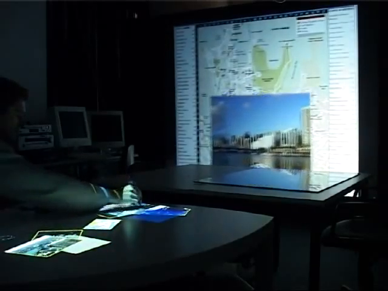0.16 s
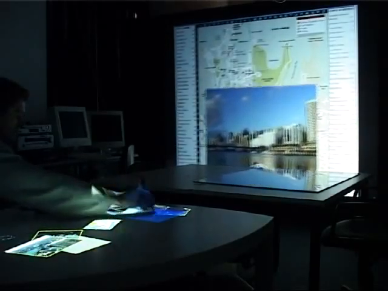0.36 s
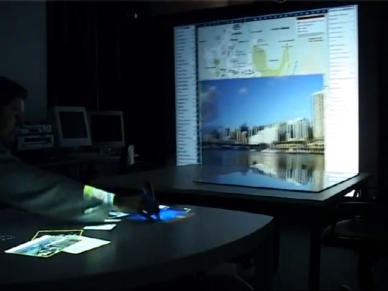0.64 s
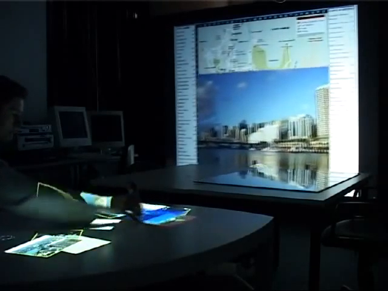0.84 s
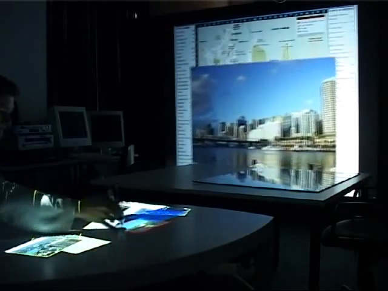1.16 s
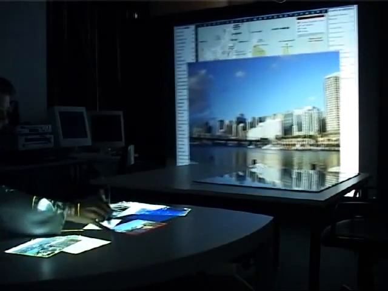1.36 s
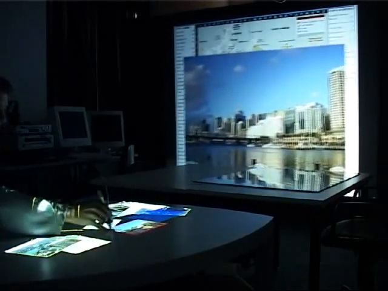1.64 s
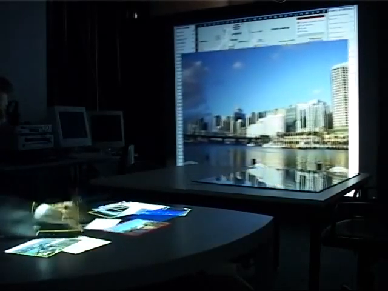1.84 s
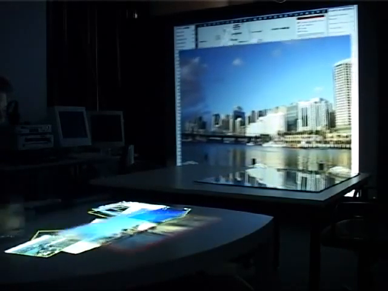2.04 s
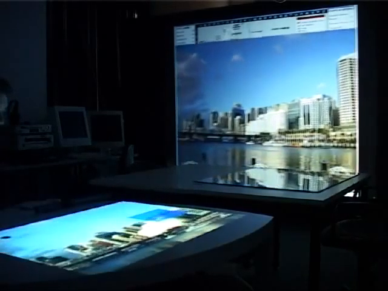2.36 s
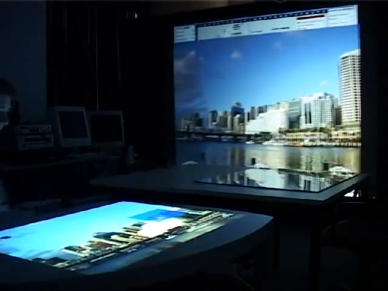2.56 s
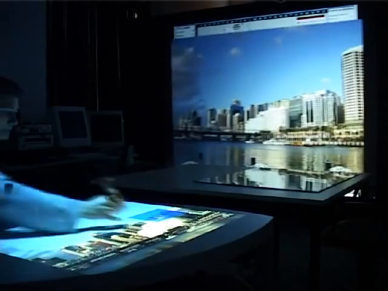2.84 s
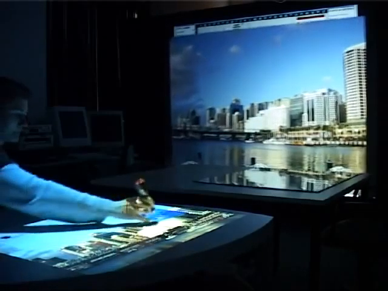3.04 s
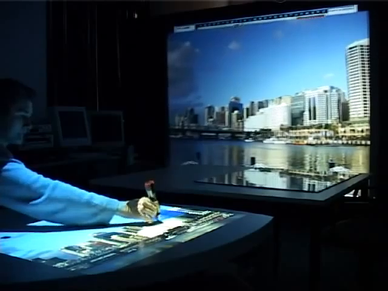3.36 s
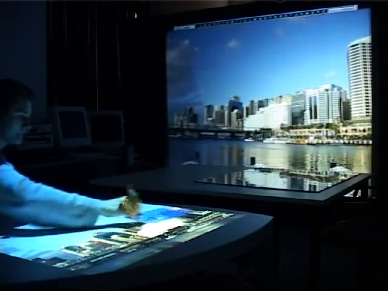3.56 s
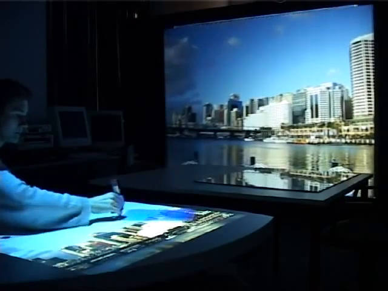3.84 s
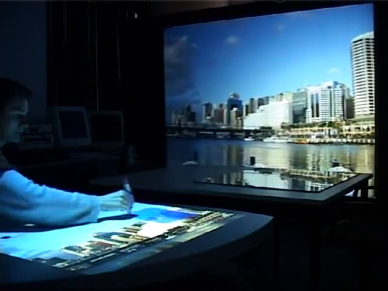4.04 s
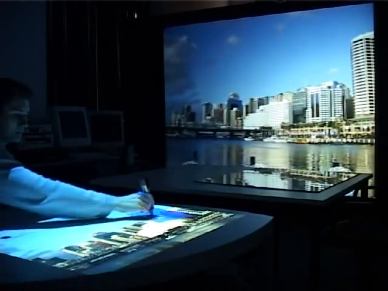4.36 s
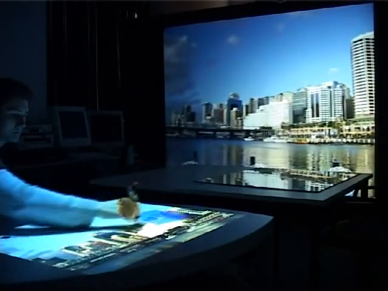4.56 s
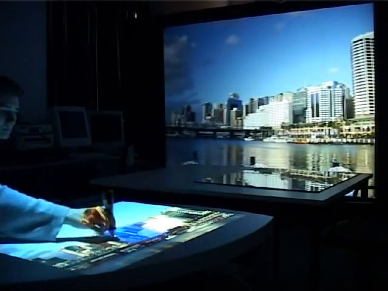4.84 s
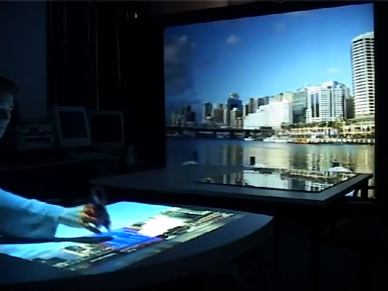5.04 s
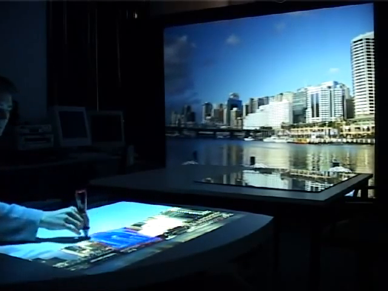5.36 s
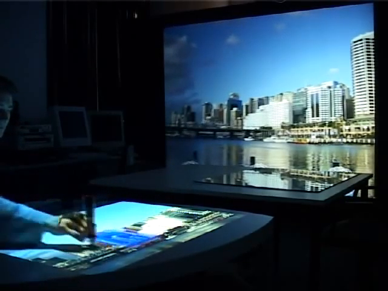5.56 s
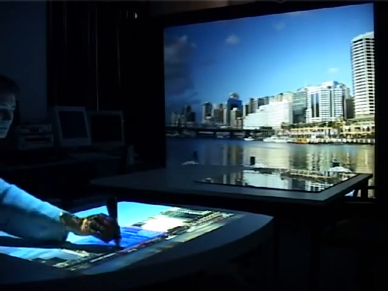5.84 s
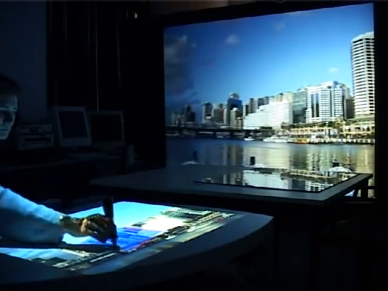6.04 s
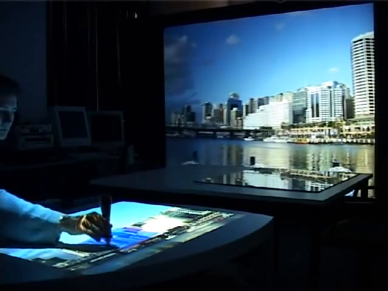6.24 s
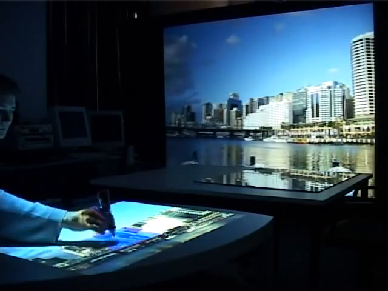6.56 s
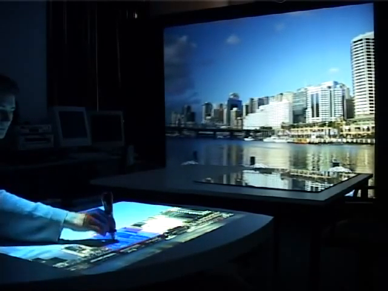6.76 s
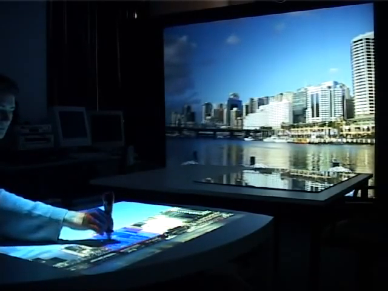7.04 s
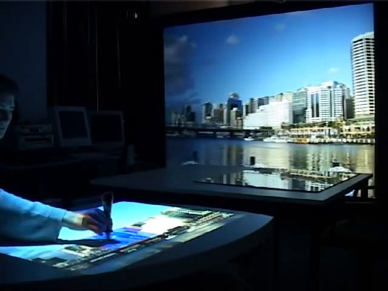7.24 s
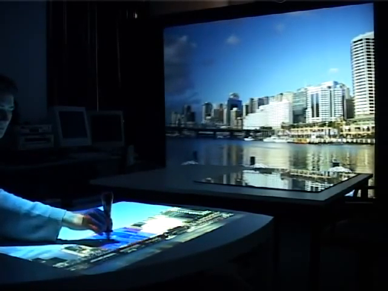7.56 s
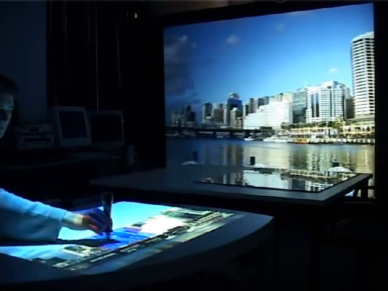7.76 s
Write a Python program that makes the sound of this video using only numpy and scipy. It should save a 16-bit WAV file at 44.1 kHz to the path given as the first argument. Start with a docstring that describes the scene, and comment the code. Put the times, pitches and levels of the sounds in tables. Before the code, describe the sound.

An indoor office with smooth, low-weighted fan noise, thin steady motor tones and a deep hum wavering in pitch and strength, throughout about eight seconds. A stylus works on a hard tabletop a few metres away. At 0.05 s it taps with a crisp click and short hollow knock; a barely audible touch comes at 0.46 s, amid very faint rubbing from 0.15 to 1.2 s. A second clear tap at 1.6 s leads into the most noticeable scrape, hissy with a woody tone, from 1.75 to 2.4 s. Stronger taps follow at 3.3, 4.3, 5.3 and 6.75 s, each a tight double contact with a low thump and brief room echo. Soft drags follow at 3.4-4.05, 4.4-4.9 and, fainter, 5.4-5.85 s. After the last tap, only fans and hum remain, the hum swelling slightly toward the end.

```python
"""In a dim office, a plastic stylus taps a hard round tabletop and drags across it between taps, a few metres away.
Each tap is a short click, damped tabletop modes and a low thump; the tip touches twice, and the walls answer.
Strokes are random slips of the tip, coloured into a hiss and a tabletop resonance.
Behind them are fans (shaped noise), a low wavering hum (a gliding tone) and thin, steady motor tones."""
import sys
import numpy as np
from scipy import signal
from scipy.fft import rfft, irfft
from scipy.io import wavfile
from scipy.ndimage import uniform_filter1d

SR = 44100
rng = np.random.default_rng(int(sys.argv[2]) if len(sys.argv) > 2 else 0)


def digitize_waveform(pressure):
    """Quantize a signal to 16-bit integers and store it at the path in sys.argv[1].

    Rows of a 2-D input are taken as channels; values are limited to [-1, 1].
    """
    field = np.atleast_2d(pressure).T
    bounded = np.clip(field, -1, 1)
    quanta = np.round(bounded * 32767).astype(np.int16)
    wavfile.write(sys.argv[1], SR, quanta)


N = 347949  # length in samples

# How a blow drives the tabletop's modes: (frequency [Hz], level [dB])
MODE_DRIVE = [(113, -22.5), (205, -23.5), (355, -23.5), (490, -24), (635, -21), (860, -14), (1100, -16.5),
              (1500, -17.5), (1800, -17.5), (2150, -14.5), (2850, -16), (3500, -19.5), (4300, -19),
              (7000, -14)]


def gain_of(db):
    """Amplitude factor of a level in dB."""
    return 10 ** (np.asarray(db) / 20)


def evened(x):
    """Scales a sound to an RMS of 1."""
    return x / np.sqrt(np.mean(x ** 2) + 1e-20)


def read(points, hz):
    """Reads a curve of (frequency, value) points along a logarithmic frequency axis."""
    f, value = np.transpose(points)
    return np.interp(np.log(hz + 1), np.log(f + 1), value)


def add(mix, s, sound):
    """Mixes a sound in at s seconds, cut off at the end of the mix."""
    part = mix[..., round(s * SR):][..., :sound.shape[-1]]
    part += sound[..., :part.shape[-1]]


def resonate(x, hz, width):
    """Shifts the frequency hz down to zero, smooths, and shifts back: a resonance of gain 1."""
    turn = np.exp(2j * np.pi * np.cumsum(hz * np.ones(len(x))) / SR)
    r = np.exp(-np.pi * width / SR)
    smoothed = signal.lfilter([1 - r], [1, -r], x / turn + 1e-18)
    return 2 * (turn * smoothed).real


def pair(a, b, same):
    """Two microphone spectra that share a part of their noise."""
    same = np.clip(same, -1, 1)[:, None]
    return np.array([a, same * a + np.sqrt(1 - same ** 2) * b])


def tip_click(t, spot_hz):
    """The tip clicks for a cycle or two, pitched a little above the main ring of the struck spot."""
    over_spot, decay_s = 1.244, 0.00041
    return -np.exp(-(t / decay_s) ** 2) * np.sin(2 * np.pi * over_spot * spot_hz * t)


def tabletop_ring(t, spot_hz, width_hz, spot_db, lower_db):
    """The tabletop's damped modes ring together, strongest around the pitch of the struck spot."""
    # Damped modes of the tabletop: (frequency [Hz], time to fall 60 dB [s])
    table_modes = [(285, 0.027), (420, 0.032), (490, 0.076), (560, 0.063), (635, 0.065), (720, 0.027),
                   (800, 0.041), (900, 0.042), (1010, 0.042), (1180, 0.042), (1290, 0.035), (1410, 0.027),
                   (1500, 0.033), (1640, 0.019), (1800, 0.036), (2020, 0.0061), (2280, 0.013),
                   (2750, 0.0068), (3000, 0.005), (3500, 0.0047), (4300, 0.0035), (5200, 0.004),
                   (7000, 0.00063)]
    lower_hz = 1050  # modes under this are the lower ones
    load = 1 + .012 * rng.standard_normal(len(table_modes))  # the resting hand detunes the modes slightly
    ring = np.zeros(len(t))
    for k, (hz, t60) in enumerate(table_modes):
        spot_boost_db = spot_db * np.exp(-(2 * (hz - spot_hz) / width_hz) ** 2)
        drive_db = read(MODE_DRIVE, hz) + spot_boost_db + lower_db * (hz < lower_hz)
        # neighbouring modes start in opposite directions
        ring += (-1) ** k * gain_of(drive_db - 60 * t / t60) * np.sin(2 * np.pi * hz * load[k] * t)
    return ring


def low_thump(t):
    """Slow low modes swell within milliseconds and ring on, slightly out of step between the microphones."""
    # Slow low modes: (frequency [Hz], time to fall 60 dB [s])
    slow_modes = [(113, 0.77), (136, 0.21), (197, 0.48), (213, 0.68), (345, 0.51), (363, 0.36)]
    start = rng.random((len(slow_modes), 1, 1))  # phases in cycles
    start = start + 0.043 * rng.standard_normal((len(slow_modes), 2, 1))
    thump = np.zeros((2, len(t)))
    for (hz, t60), cycles in zip(slow_modes, start):
        thump += gain_of(read(MODE_DRIVE, hz) - 60 * t / t60) * np.sin(2 * np.pi * (hz * t + cycles))
    return thump * (1 - np.exp(-t / 0.0013))


def tap(blow_db, click_db, spot_hz, width_hz, spot_db, lower_db, thump_db):
    """One contact: the tip clicks, the tabletop's modes take over, and the low modes swell and ring on."""
    t = np.arange(SR // 2) / SR
    onset = 1 - np.exp(-(t / 0.0001) ** 2)
    click = onset * tip_click(t, spot_hz)
    ring = onset * tabletop_ring(t, spot_hz, width_hz, spot_db, lower_db)
    thump = low_thump(t)
    return gain_of(blow_db + click_db) * click, gain_of(blow_db) * ring, gain_of(blow_db + thump_db) * thump


def stroke(start, fast_s, firm_s, end, hiss_db, body_db):
    """The tip catches on the grain thousands of times a second: speed makes a hiss, pressure hums the main modes."""
    # Colour of the rubbing hiss: (frequency [Hz], level [dB per Hz])
    rub_colour = [(1060, -36), (1800, -2.5), (2770, 0.5), (3480, -7.5), (4050, -0.5), (7250, -10.5),
                  (9240, -16.5), (10400, -145), (11000, -37), (14300, -88.5), (22000, -120)]
    start_db, end_db, roundness = -8, -22, 1.88  # levels below the top at both ends; shape of the swell
    slips_per_s, body_hz, body_width_hz = 6000, 1440, 740
    t = np.arange(start, end, 1 / SR)

    def swell(top_s):
        away = np.interp(t, [start, top_s, end], [-1, 0, 1])
        return gain_of(np.where(away < 0, start_db, end_db) * abs(away) ** roundness)

    speed, pressure = swell(fast_s), swell(firm_s)
    size, chance, sign = rng.exponential(1, len(t)), rng.random(len(t)), rng.standard_normal(len(t))
    slips = gain_of(4.2 * np.minimum(size, 3.5)) * sign * (chance < slips_per_s / SR)
    hz = np.fft.rfftfreq(len(t), 1 / SR)
    hiss = evened(irfft(rfft(slips) * gain_of(read(rub_colour, hz)), len(t)))
    body = resonate(slips, body_hz, body_width_hz)
    body = evened(resonate(body, body_hz, body_width_hz))
    rub = gain_of(hiss_db) * speed * hiss + gain_of(body_db) * pressure * body
    return start, rub * signal.windows.tukey(len(t), .15)


def early_echoes():
    """Direct sound, then single echoes from table, floor and walls."""
    # Single echoes: (delay [s], left level [dB], right level [dB])
    echo_list = [(.0034, -9, -10), (.0062, -9, -8), (.0102, -7, -8), (.019, -6, -7)]
    right_lag = 1  # samples by which the tabletop reaches the right microphone later
    early = np.zeros((2, 2048))
    for k, (s, left_db, right_db) in enumerate(echo_list):
        width = int(1 + s * 600)  # samples; later echoes have lost more treble
        early[:, round(s * SR):][:, :width] = -(-1) ** k * gain_of([[left_db], [right_db]]) / width
    early[0, 0] = early[1, right_lag] = 1
    return early


def room_tail():
    """A dense scatter of reflections that dies away band by band."""
    # Reverberation by band: (frequency [Hz], time to fall 60 dB [s], relative tail level [dB])
    tail_bands = np.array([(100, 0.86, 7.5), (300, 0.46, 7.5), (810, 0.49, -2.5), (1490, 0.51, -1),
                           (3170, 0.71, -1), (5730, 0.51, -7), (9900, 0.11, -5)])
    # Left-right likeness of the tail: (frequency [Hz], likeness [-1 to 1])
    tail_likeness = [(100, 0.44), (600, 0.89), (1500, 0.5), (3000, 0.089), (8000, 0.82)]
    reflections = np.zeros((2, SR))
    at = np.arange(300, SR - 20, 20) + rng.integers(0, 20, (2, (SR - 301) // 20))
    np.put_along_axis(reflections, at, rng.choice([-1., 1.], at.shape), 1)
    hz, t, z = signal.stft(reflections, SR, nperseg=256)
    t60 = read(tail_bands[:, [0, 1]], hz)[:, None]
    level_db = read(tail_bands[:, [0, 2]], hz)[:, None]
    fading = pair(z[0], z[1], read(tail_likeness, hz)) * gain_of(level_db - 60 * t / t60)
    tail = signal.istft(fading, SR, nperseg=256)[1]
    return tail / np.linalg.norm(tail[0])


def hum():
    """A low tone that wavers in pitch and strength, louder and earlier on the right, with weak overtones."""
    # Path of the hum: (time [s], pitch [Hz], level before flutter and left-right tilt [dB])
    hum_path = [(0.0, 71.8, -52), (0.24, 73.8, -35), (0.36, 73.92, -43.5), (1.27, 77, -48),
                (2.28, 76.7, -44.5), (2.4, 70.35, -44), (3.07, 72.8, -43.5), (3.25, 66, -41),
                (4.22, 66.65, -39.5), (4.35, 63, -43), (4.55, 62, -43.5), (4.78, 66.8, -51.5),
                (4.9, 69.8, -36), (5.36, 70.3, -55), (5.47, 72.1, -42.5), (5.78, 75, -54),
                (5.91, 74.8, -38.5), (6.57, 74.8, -54.5), (6.68, 74.3, -37.5), (7.03, 77.5, -48),
                (7.27, 74.2, -35), (7.36, 75.2, -44), (7.49, 70.3, -30.5), (7.72, 72.3, -30.5),
                (7.79, 72.9, -41), (7.89, 73.3, -28)]
    flutter_db, flutter_hz = 1.5, 7.5  # RMS depth; fastest rate
    s, hz, db = np.transpose(hum_path)
    t = np.arange(N) / SR
    rates = flutter_hz * np.geomspace(.3, 1, 12)
    flutter = evened(sum(np.sin(2 * np.pi * (f * t + rng.random())) for f in rates))
    phase = 2 * np.pi * np.cumsum(np.interp(t, s, hz)) / SR + np.array([[0], [.3]])  # right leads
    tone = np.sin(phase) + gain_of(-20.0) * np.sin(2 * phase) + gain_of(-23) * np.sin(3 * phase)
    level = gain_of(np.interp(t, s, db) + flutter_db * flutter)
    return np.sqrt(2) * level * tone * gain_of([[-1.3], [1.2]])


def fans():
    """Smooth air noise with faint patches and narrow humps from casings and room modes."""
    # Colour of the air noise: (frequency [Hz], relative level [dB per Hz])
    air_colour = [(20, -40), (33, -16), (50, -1), (78, -3), (98, -15), (160, -10.5), (400, -15.5),
                  (1180, -19.5), (2050, -27), (3500, -33), (5500, -36), (8000, -46), (9500, -48),
                  (11200, -54.5)]
    # Humps: (frequency [Hz], width [Hz], level above the air noise [dB])
    humps = [(111, 30, 2.5), (146.4, 13.5, 5), (200, 15, 3.5), (362.5, 13.5, 6.5), (486.5, 4, 13),
             (797, 9.9, 9), (1208, 33, 5.5)]
    # Left-right likeness of the noise: (frequency [Hz], likeness [-1 to 1])
    air_likeness = [(60, 0.5), (140, 0.95), (340, 0.77), (800, 0.72), (1900, 0.27), (4510, -0.14),
                    (10700, 1)]
    fans_db, patch_db = -43.5, 1.26  # both RMS
    frames, hz = N // 1024 + 5, np.fft.rfftfreq(4096, 1 / SR)
    a, b, c, d, patches = rng.standard_normal((frames, 2049, 5)).T
    patches = uniform_filter1d(patches, size=40, axis=0)  # along frequency
    patches = evened(uniform_filter1d(patches, size=3, axis=1))  # along time
    colour_db = read(air_colour, hz) + sum(db / (1 + (2 * (hz - f) / w) ** 2) for f, w, db in humps)
    noise = pair(a + 1j * b, c + 1j * d, read(air_likeness, hz))
    z = noise * gain_of(colour_db[:, None] + patch_db * patches)
    return gain_of(fans_db) * evened(signal.istft(z, nperseg=4096, noverlap=3072)[1][:, :N])


def motors():
    """Thin steady tones of small motors, each a sine with narrow noise that gives it a slight waver."""
    # Motor tones: (frequency [Hz], level [dB], width of the waver [Hz])
    motor_tones = [(49.9, -51, 1.3), (121, -57, 1)]
    t = np.arange(N) / SR
    total = np.zeros(N)
    for hz, db, width in motor_tones:
        waver = evened(resonate(rng.standard_normal(N), hz, width))
        total += gain_of(db) * evened(np.sin(2 * np.pi * hz * t) + 0.35 * waver)
    return total


def scene():
    """Places taps and strokes in the room, over the fans, hum and motors."""
    # Taps: (time [s], blow [dB], left over right [dB], delay of the spring tip's second contact [ms],
    #   its level [dB], click [dB], main ring of the struck spot [Hz], its width [Hz], its boost [dB],
    #   lower modes [dB], thump [dB])
    tap_list = [(0.0537, -15, .3, 1.46, 1, 8.5, 1350, 330, 9, -4, 3.2),
                (0.462, -30.5, 0, 1.6, -12, -18, 1270, 300, -2, 4, 0.75),
                (1.631, -13.5, .3, 1.69, 2.5, 3, 1344, 520, 11, -2, 2.26),
                (3.281, -8, 0, 1.35, 4, 3, 1477, 400, 10, -2.5, -1.08),
                (4.3348, -9, 1, 1.125, 1.5, 4, 1584, 520, 11, 1.5, 0.11),
                (5.332, -7, .3, 1.5, 5, 0, 1434, 360, 14, 0, -0.89),
                (6.7587, -9, .1, 1.42, 2, 0, 1384, 420, 10, -2, 0.77)]
    # Strokes: (start [s], time of top speed [s], time of top pressure [s], end [s], hiss [dB], tabletop [dB])
    stroke_list = [(.15, 0.425, 0.36, .64, -54.5, -60), (.7, 0.919, 1.3, 1.17, -54, -64),
                   (1.74, 1.93, 2.16, 2.42, -49.5, -47.5), (3.419, 3.854, 3.95, 4.06, -50.5, -53.5),
                   (4.415, 4.63, 4.65, 4.88, -50, -55), (5.418, 5.595, 5.7, 5.85, -55, -58)]
    mix = fans() + hum() + motors()
    for s, blow_db, pan_db, again_ms, again_db, *colour in tap_list:
        click, ring, thump = tap(blow_db, *colour)
        near = click + ring
        add(near, again_ms / 1000, gain_of(again_db) * near)  # second contact
        direct = signal.fftconvolve([near], early_echoes(), axes=1)
        add(mix, s, direct * gain_of([[pan_db / 2], [-pan_db / 2]]))
        # the click beams toward the microphones, so the walls hear less of it than of the tabletop
        to_walls = gain_of(5.0) * ring + gain_of(-10.5) * click
        add(mix, s, signal.fftconvolve([to_walls], room_tail(), axes=1))
        add(mix, s, thump)
    rubbing = np.zeros(N)
    for row in stroke_list:
        add(rubbing, *stroke(*row))
    add(mix, 0, signal.fftconvolve([rubbing], gain_of(-3.5) * early_echoes(), axes=1))
    add(mix, 0, signal.fftconvolve([rubbing], gain_of(-2.0) * room_tail(), axes=1))
    return mix


def record(dry):
    """The band limit of the recorder: a steep low-pass filter."""
    edge_hz = 11250
    lowpass = signal.firwin(511, edge_hz, window=("kaiser", 9), fs=SR)
    return signal.oaconvolve(dry, lowpass[None], "same")


dry = scene()
out = record(dry)
digitize_waveform(out)
```